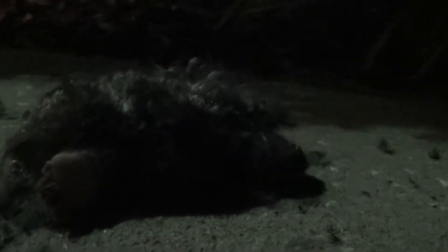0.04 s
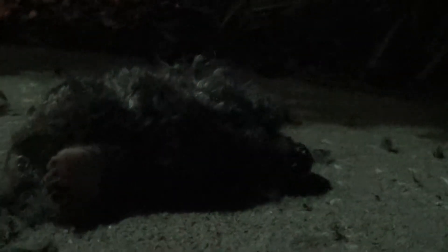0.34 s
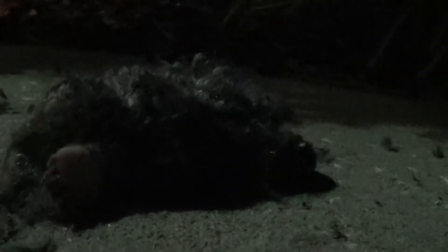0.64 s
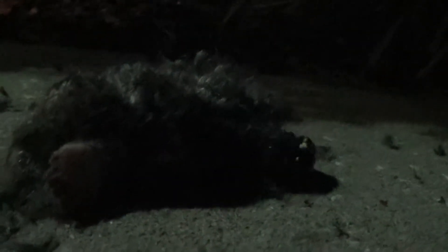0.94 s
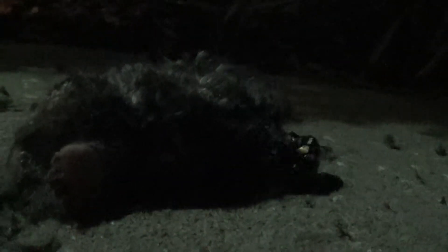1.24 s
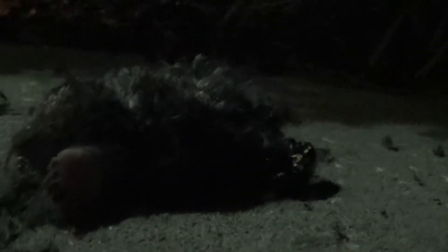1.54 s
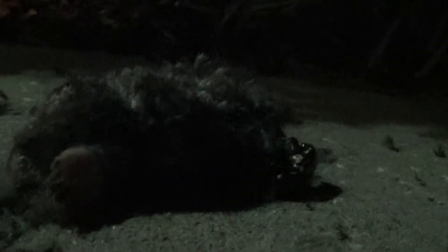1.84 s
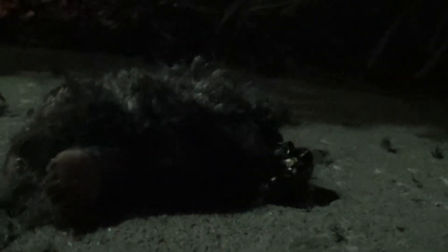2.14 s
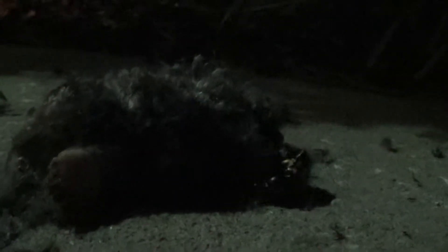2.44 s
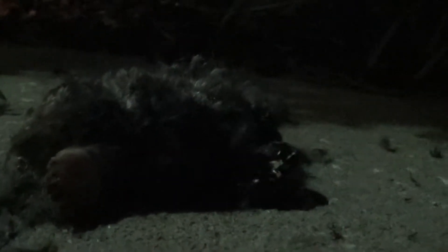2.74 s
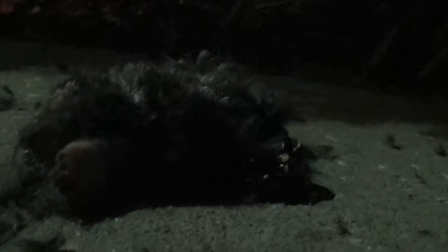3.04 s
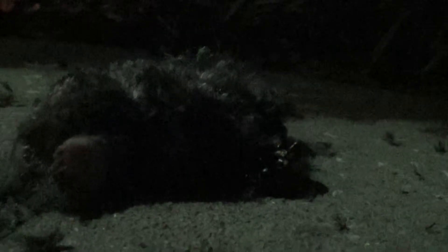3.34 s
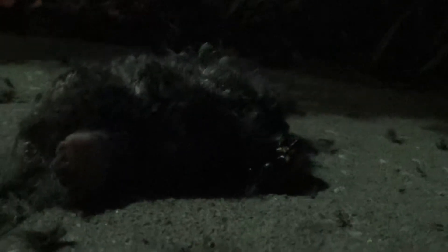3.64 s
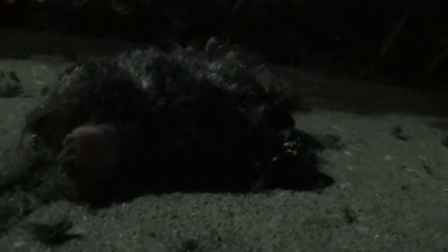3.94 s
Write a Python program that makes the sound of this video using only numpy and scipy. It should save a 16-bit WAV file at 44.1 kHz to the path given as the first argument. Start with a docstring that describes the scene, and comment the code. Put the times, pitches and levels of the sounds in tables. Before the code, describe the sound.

Quick, scratchy beetle squeaks close by, fading out and leaving high night insects droning.

```python
"""A squeaking beetle at night

A beetle close by on the ground squeaks about five times a second, then gives up. It drags a scraper
over a row of fine teeth, one click a tooth: a loud push that slows down, then a fainter, brighter
return stroke. Night insects shrill over a low rumble, the soil rustles, and a far hoot sounds once."""
import sys
import numpy as np
from scipy import signal
from scipy.fft import rfft, irfft
from scipy.io import wavfile

SR = 44100
rng = np.random.default_rng(int(sys.argv[2]) if len(sys.argv) > 2 else 0)


def materialize(psi):
    """Save the field psi as 16-bit PCM at rate SR to the path in sys.argv[1].

    A 1-D psi becomes a single channel; in a 2-D psi each row is a channel.
    """
    bounded = np.clip(np.atleast_2d(psi).T, -1, 1)
    quanta = np.round(bounded * 32767).astype(np.int16)
    wavfile.write(sys.argv[1], SR, quanta)


N = 176400  # 4 seconds

# Rumble and hiss of the night air: pitch_hz, level_db
AIR_COLOUR = [(25, -5.5), (42, -23), (60, 4), (75, -3.5), (92, -3.5), (120, -0.5), (170, -5), (230, -4.5),
              (330, -11), (780, -11.5), (1100, -18), (2720, -24), (3300, -21), (4200, -28), (5600, -27),
              (9200, -27.5), (16000, -33.5)]
# How much the air differs between left and right: pitch_hz, level_db
AIR_WIDTH = [(60, -40), (250, -11), (600, -6), (1400, -2), (4000, -5.5), (9000, -3), (16000, -20)]
# Wavering distant tones: pitch_hz, width_hz, level_db
HUMS = [(73, 9, -53), (117, 7, -54), (1684, 13, -64.5)]
# The shrill band of the insects: pitch_hz, level_db
CHORUS_COLOUR = [(5600, -39), (6150, -25.5), (6700, 1), (6900, 5.5), (7060, 6), (7250, -2), (7420, -10),
                 (7600, -21), (8200, -72)]
# Faint rustles on the soil: start_s, decay_s, level_db
RUSTLES = [(0, 0.052, -39), (3.000, 0.065, -42), (3.51, 0.051, -54)]
# Tone of a rustle: pitch_hz, level_db
RUSTLE_COLOUR = [(1500, -40), (7000, -29), (8300, -8), (9700, -5), (11000, -18), (16000, -30)]
# Push strokes (a share runs from 0 to 1; peak_share is how far in the force is greatest):
# start_s, length_s, force_db, top_teeth_per_s, treble_db, run_up_s, peak_share
PUSH_STROKES = [(0.07, 0.077, 0.5, 1389, -1, 0.013, 0.51), (0.251, 0.079, 1.5, 1426, -2.5, 0.016, .55),
                (0.44, 0.081, 1, 1358, -3, 0.015, 0.51), (0.633, 0.081, -1, 1387, -5, 0.022, 0.55),
                (0.843, 0.08, -0.5, 1405, -5, .018, 0.45), (1.032, 0.078, -0.5, 1390, -5, 0.019, 0.6),
                (1.224, 0.085, -0.5, 1445, -1, 0.0095, 0.41), (1.414, 0.082, 1.5, 1392, 3, 0.015, 0.48),
                (1.624, 0.077, 2.5, 1415, 3.5, .014, 0.4), (1.82, 0.071, 3, 1323, 5.5, 0.0096, 0.23),
                (1.985, 0.064, -8, 1534, -2, 0.013, 0.37), (2.169, 0.064, -10, 1535, 0.5, 0.018, 0.16),
                (2.453, 0.048, -13.5, 1307, 3, .017, 0.7)]
# How a push slows after its run-up: time_share, top_speed_share
PUSH_SLOWING = [(0, 1), (.15, .985), (.3, .945), (.5, .86), (.7, .72), (.85, .53), (1, .22)]
# Ring of the shell under a firm push: pitch_hz, level_db
SHELL_FIRM = [(600, -51.5), (2000, -21), (2600, -8), (3050, -9), (3550, -3), (4200, -3.5), (5100, 0.5),
              (6200, -2), (7800, -5), (9200, -7.5), (10700, -7), (11800, -14.5), (14300, -24.5),
              (16000, -37.5)]
# Ring of the shell under a light touch: pitch_hz, level_db
SHELL_LIGHT = [(700, -29.5), (1400, -12.5), (2000, -7.5), (2800, -6.5), (3400, -9), (6000, -3), (8500, -6),
               (9900, -10.5), (11700, -2.5), (13000, -8), (14400, -7.5), (16000, -9)]
# Return strokes: start_s, length_s, force_db, top_teeth_per_s, fade_db
RETURN_STROKES = [(0.164, 0.086, 1, 1193, 11), (0.348, 0.081, 2.5, 1150, 16.5), (0.54, 0.092, -1, 1092, 12),
                  (0.722, 0.047, -1.5, 993, 7), (0.939, 0.08, 0, 1270, 16), (1.13, 0.081, 0, 1186, 13.5),
                  (1.321, 0.077, 3, 1365, 15), (1.514, 0.085, 3, 954, 17), (1.7162, 0.099, 9, 1280, 23.5),
                  (1.914, 0.064, 11.5, 835, 21)]
# Ring of the shell on a return stroke: pitch_hz, level_db
SHELL_RETURN = [(800, -35), (2200, -15), (3400, -2.5), (5500, 2.5), (8200, -4.5), (10000, -1),
                (12500, -0.5), (14300, -9), (16000, -12)]
# One falling hoot: start_s, length_s, pitch_hz, fall_hz, level_db
FAR_HOOT = (2, 0.05, 904, 78, -48.5)
# Tiny ticks of grit: start_s, level_db
GRIT_TICKS = [(2.587, -40.5), (3.063, -48)]
# Tone of a tick: pitch_hz, level_db
GRIT_COLOUR = [(1000, -15), (4000, -11), (11000, 7), (16000, -3)]

AIR_DB, CHORUS_DB, PUSH_DB, TOUCH_DB, RETURN_DB = -43.5, -36.5, -3.5, -12.5, -19
PAN_DB = -1.7  # beetle, soil and chorus sit a little to the right
TREBLE_HZ = (7400, 9000)  # a treble boost starts at the first pitch and is full at the second
OPPOSITE = np.array([[1], [-1]])  # adds a sound on the left and subtracts it on the right, for width


def gain(db):
    """Turn decibels into a number to multiply by."""
    return 10 ** (np.asarray(db) / 20)


def unit(x):
    """Scale a sound to an average (rms) level of 1."""
    return x / np.sqrt(np.mean(x ** 2))


def curve(points, hz):
    """Read levels from a table of pitch_hz, level_db, filling in between its rows."""
    p = np.array(points, float)
    return np.interp(np.log(np.maximum(hz, 1)), np.log(p[:, 0]), p[:, 1])


def bins(size):
    """The pitches in the spectrum of this many samples."""
    return np.arange(size // 2 + 1) * SR / size


def noise(db):
    """Noise shaped by a level for each pitch."""
    return unit(irfft(rfft(rng.standard_normal(N)) * gain(db), N))


def wander(rate_hz):
    """A random drift of about 1 either way, mostly slower than rate_hz."""
    return noise(-10 * np.log10(1 + (bins(N) / rate_hz) ** 4))


def ring(db):
    """The shortest click that starts at once and has the given level at each pitch."""
    cepstrum = irfft(np.log(gain(db)))
    half = len(cepstrum) // 2
    return irfft(np.exp(rfft(np.r_[cepstrum[0], 2 * cepstrum[1:half], np.zeros(half)])))


def add(out, start_s, x):
    """Mix x into out at a given time."""
    i = max(int(start_s * SR), 0)
    out[i:i + len(x)] += x[:N - i]


def pan(db):
    """Left and right gains, with the left louder by db."""
    return gain(OPPOSITE * db / 2)


def night_air():
    """Distant rumble and hiss with a few wavering tones; the bass is the same left and right."""
    hz = bins(N)
    middle, side = (noise(curve(AIR_COLOUR, hz)) for _ in range(2))
    side = irfft(rfft(side) * gain(curve(AIR_WIDTH, hz)), N)
    hum = sum(gain(db) * noise(-20 * np.log10(1 + ((hz - pitch_hz) / width_hz * 2) ** 2))
              for pitch_hz, width_hz, db in HUMS)
    return gain(AIR_DB) * (middle + side * OPPOSITE) + hum


def insect_chorus(flutter_db=0.98, swell_db=0.97, side_db=-3.5):
    """Many far insects merge into one narrow, fluttering band."""
    colour = curve(CHORUS_COLOUR, bins(N))
    middle, side = (unit(noise(colour) * gain(flutter_db * wander(54) + swell_db * wander(0.44)))
                    for _ in range(2))
    return gain(CHORUS_DB) * pan(PAN_DB) * (middle + gain(side_db) * side * OPPOSITE)


def soil(rise_s=0.0033, tick_decay_s=0.0036):
    """Small rustles and ticks of grit: bursts of noise that die away."""
    t, rustles, ticks = np.arange(N) / SR, np.zeros(N), np.zeros(N)
    for start_s, decay_s, db in RUSTLES:
        add(rustles, start_s, gain(db) * np.exp(-t / decay_s) * (1 - np.exp(-t / rise_s)))
    for start_s, db in GRIT_TICKS:
        add(ticks, start_s, gain(db) * np.exp(-t / tick_decay_s))
    rough_hiss = noise(curve(RUSTLE_COLOUR, bins(N))) * gain(2 * wander(250))
    return rustles * rough_hiss + ticks * noise(curve(GRIT_COLOUR, bins(N)))


def scrape(teeth_per_s, uneven_share, *voices, tooth_spread_db=.4, grit_db=-9.5):
    """Each tooth passed makes a gritty click. A voice is a level over time and a ring of the shell."""
    chance = rng.standard_normal((256, 50))  # a row per tooth: spacing, strength, then grit
    travel = np.cumsum(teeth_per_s) / SR
    teeth = np.r_[0, np.cumsum(1 + uneven_share * chance[1:, 0])]
    teeth = teeth[teeth < travel[-1]]
    hit_sample = np.interp(teeth, travel, np.arange(len(travel)))
    chance, whole = chance[:len(teeth)], hit_sample.astype(int)
    index = whole[:, None] + np.arange(48)
    lag = index - hit_sample[:, None] - 8  # samples since the middle of each click
    grit = chance[:, 2:] * (lag > 0) * np.exp(-lag / 20) / np.sqrt(10)
    slip = np.sinc(lag) * np.exp(-(lag / 4) ** 2)
    clicks = (slip + gain(grit_db) * grit) * gain(tooth_spread_db * chance[:, 1:2])
    out = 0
    for db, shell in voices:
        scaled_clicks = gain(db[whole])[:, None] * clicks
        click_train = np.bincount(index.ravel(), scaled_clicks.ravel())
        out = out + signal.fftconvolve(click_train, shell)
    return out


def pushes(start_speed_share=.55, press_db=8, ease_db=4.5, grip_db=-1):
    """The scraper speeds up over the teeth, bites as it presses in, then slows to single clicks."""
    out, hz = np.zeros(N), bins(512)
    treble = np.interp(hz, TREBLE_HZ, (0, 1))
    for start_s, length_s, db, top_rate, treble_db, run_up_s, peak in PUSH_STROKES:
        progress = np.linspace(0, 1, int(length_s * SR))
        early = np.maximum(1 - progress * length_s / run_up_s, 0)
        late = np.maximum((progress * length_s - run_up_s) / (length_s - run_up_s), 0)
        rate = top_rate * (1 - (1 - start_speed_share) * early ** 2)
        rate *= np.interp(late, *np.array(PUSH_SLOWING).T)
        drag = 0.77 * max(.5 - peak, 0) * gain(db / 2)  # bearing down early and hard slows the stroke
        rate *= 1 - drag * np.exp(-((late - .47) / 0.2) ** 2)
        before_peak = np.maximum(1 - progress / peak, 0)
        after_peak = np.maximum((progress - peak) / (1 - peak), 0)
        force_db = db - press_db * before_peak ** 1.08 - ease_db * after_peak ** 2.85
        slip_db = 1.3 * np.maximum(grip_db - force_db, 0)  # with too little force it stops biting
        bite_db = PUSH_DB + force_db - slip_db
        contact_db = 10 * np.log10(np.sin(np.pi * progress) + 0.022)
        touch_db = TOUCH_DB + .4 * force_db + contact_db  # light brushing grows less than the force
        touch = ring(curve(SHELL_LIGHT, hz) + treble_db / 2 * treble)
        # the ring turns from dull to bright as the force nears its peak
        dull = ring(curve(SHELL_FIRM, hz) + (treble_db - 7) * treble)
        bright = ring(curve(SHELL_FIRM, hz) + (treble_db + 4) * treble)
        bright_db = bite_db + force_db - db
        voices = (bite_db, dull), (bright_db, bright - dull), (touch_db, touch)
        add(out, start_s, -scrape(rate, .021, *voices))  # tooth spacing varies by about 2%
    return out


def returns(ragged_db=2, lift_s=0.0079, sag_share=0.091, uneven_share=.06):
    """On its way back the scraper catches at once, fades and lifts off; harder strokes are brighter."""
    out, hz = np.zeros(N), bins(512)
    treble = np.interp(hz, TREBLE_HZ, (0, 1))
    for start_s, length_s, db, top_rate, fade_db in RETURN_STROKES:
        progress = np.linspace(0, 1, int(length_s * SR))
        shell = ring(curve(SHELL_RETURN, hz) + .35 * db * treble)
        falter_db = ragged_db * wander(90)[:len(progress)]  # the light contact falters
        lift_db = 20 * np.log10(np.clip((1 - progress) * length_s / lift_s, .01, 1))
        level_db = RETURN_DB + db - fade_db * progress + falter_db + lift_db
        rate = top_rate * (1 - sag_share * (2 * progress - 1) ** 2)  # slower at both ends
        add(out, start_s, scrape(rate, uneven_share, (level_db, shell)))
    return out


def beetle(scatter_db=-23, scatter_s=0.0013, echo_db=-24.5, echo_s=0.04):
    """Both strokes, with a brief scatter from the ground and a faint echo from the surroundings."""
    strokes = pushes() + returns()
    t = np.arange(SR // 4) / SR
    fade = sum(gain(db) * np.exp(-t / decay_s) * np.sqrt(2 / (decay_s * SR))
               for db, decay_s in [(scatter_db, scatter_s), (echo_db, echo_s)])
    middle, side = rng.standard_normal((2, len(t))) * fade
    tail = .6 * middle + .7 * side * OPPOSITE
    return strokes + signal.fftconvolve(strokes[None], tail, axes=1)[:, :N]


def hoot():
    """One short, wavering, falling note far away."""
    start_s, length_s, pitch_hz, fall_hz, db = FAR_HOOT
    progress = np.clip((np.arange(N) / SR - start_s) / length_s, 0, 1)
    hz = (pitch_hz - fall_hz * progress) * (1 + .01 * wander(60))
    swell = np.sin(np.pi * np.sqrt(progress))
    return gain(db) * swell * np.sin(2 * np.pi * np.cumsum(hz) / SR)


def scene():
    """The beetle in front, the night around it."""
    return pan(PAN_DB) * (beetle() + soil()) + insect_chorus() + night_air() + hoot()


def record(dry):
    """Cut away the very highest treble."""
    top_hz, slope_hz = 15800, 200
    return irfft(rfft(dry) * np.clip((top_hz - bins(N)) / slope_hz + .5, 0, 1), N)


dry = scene()
out = record(dry)
materialize(out)
```